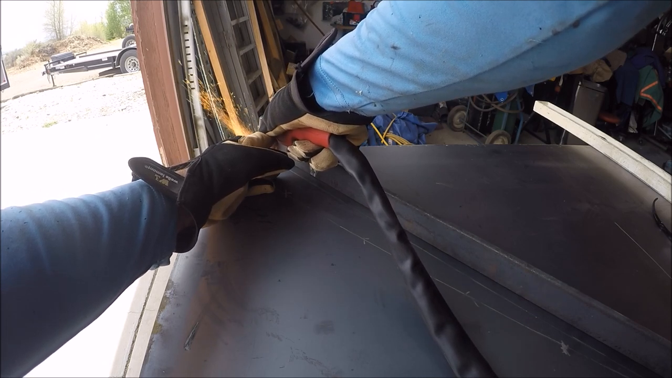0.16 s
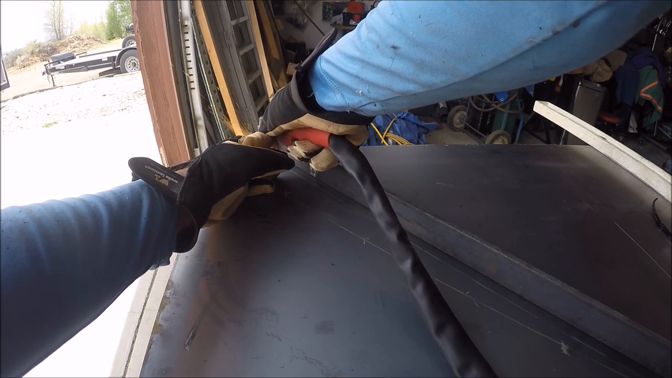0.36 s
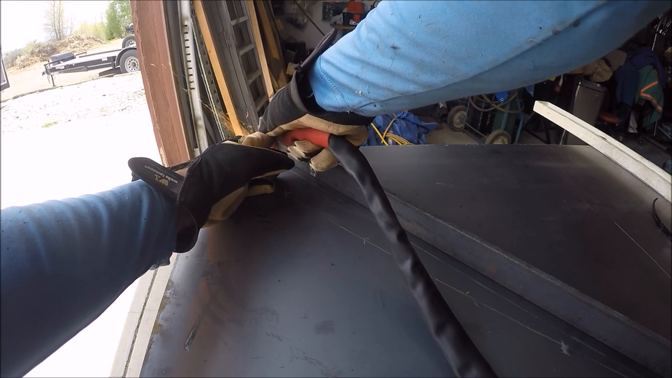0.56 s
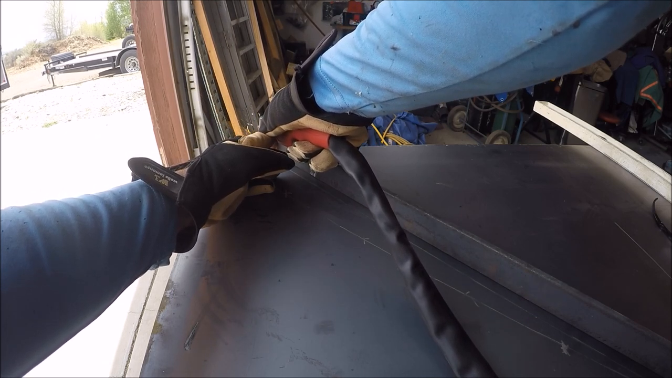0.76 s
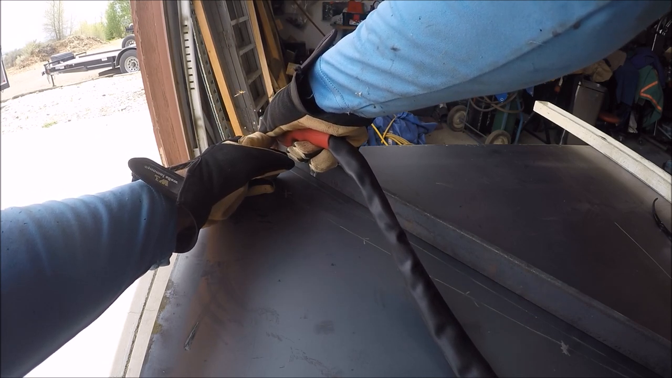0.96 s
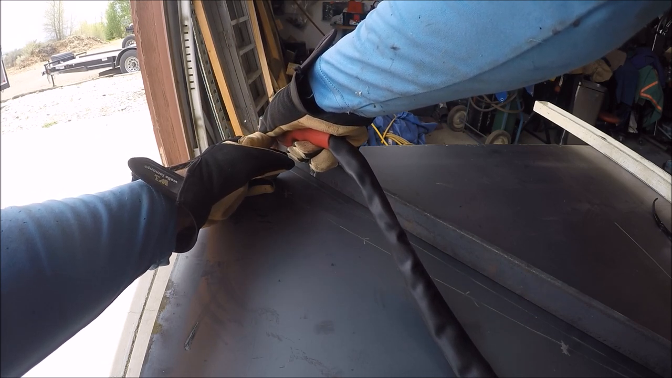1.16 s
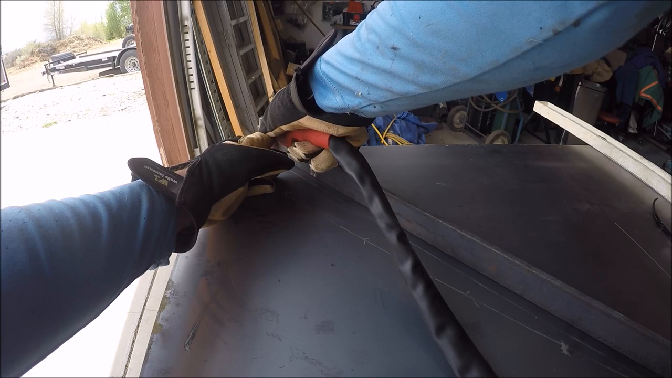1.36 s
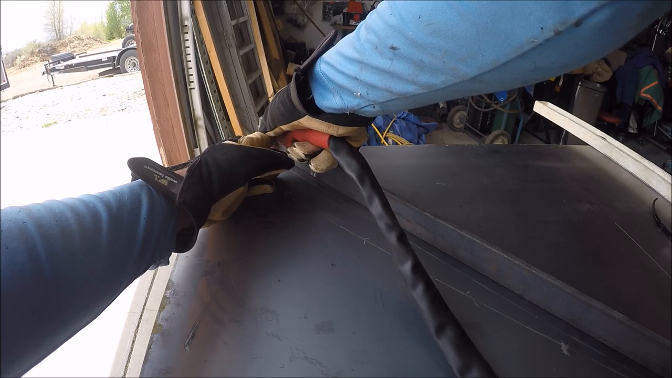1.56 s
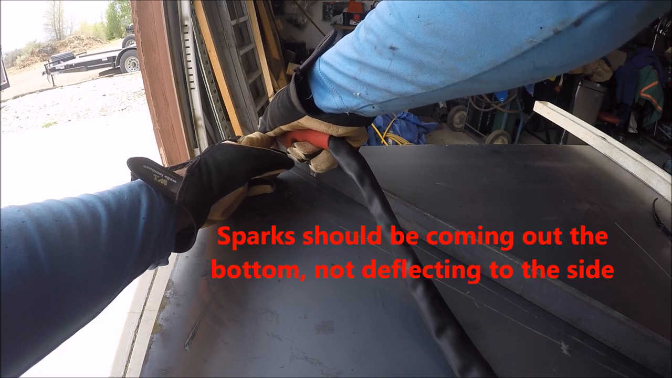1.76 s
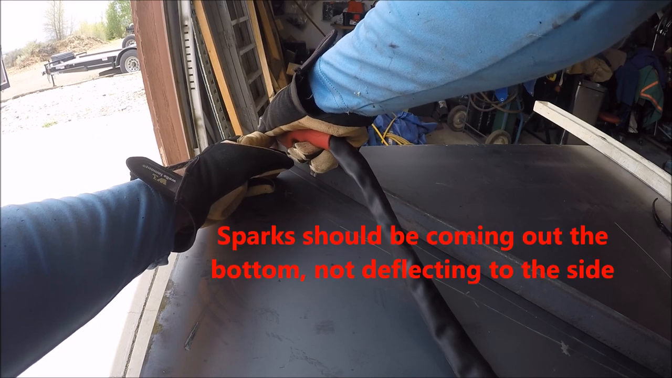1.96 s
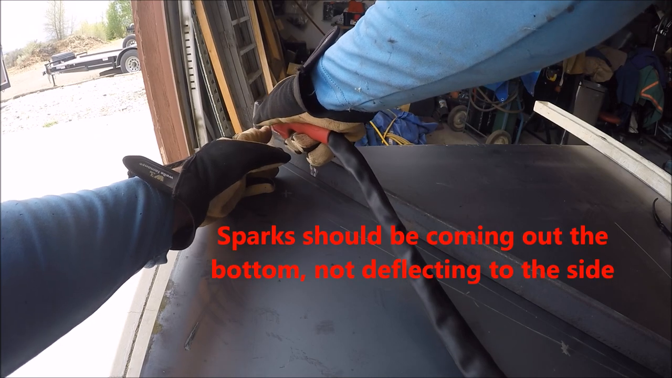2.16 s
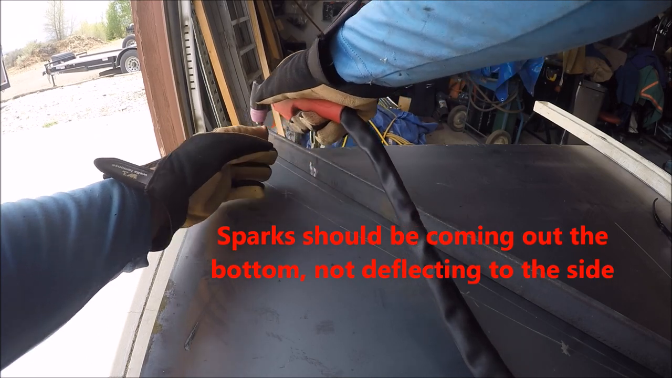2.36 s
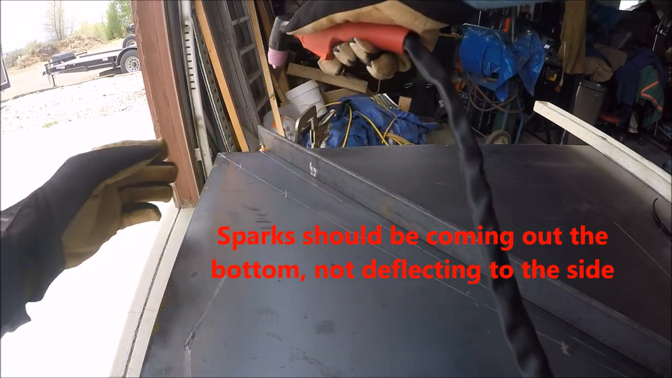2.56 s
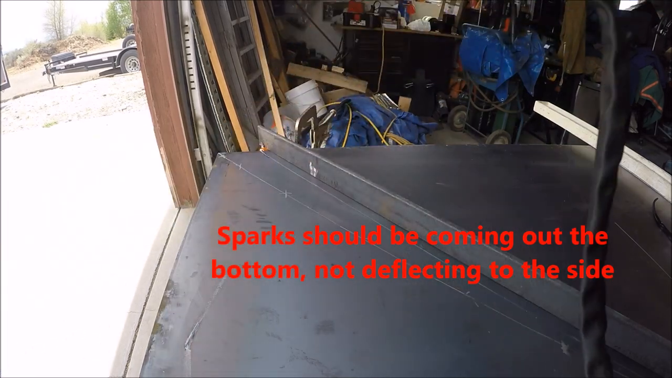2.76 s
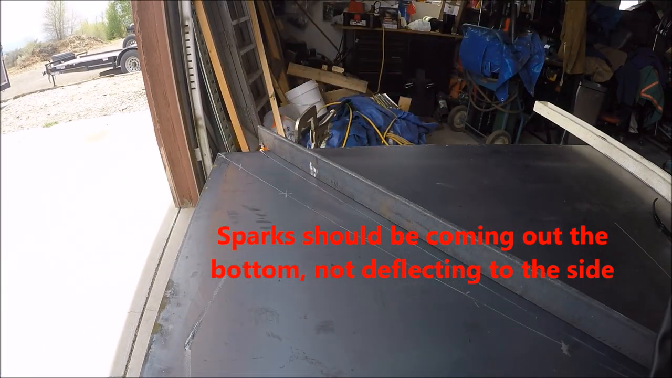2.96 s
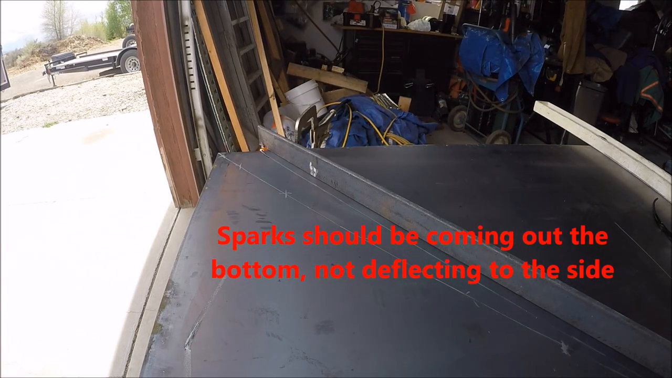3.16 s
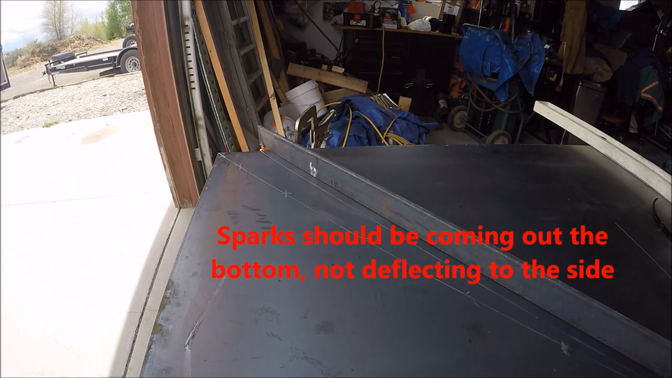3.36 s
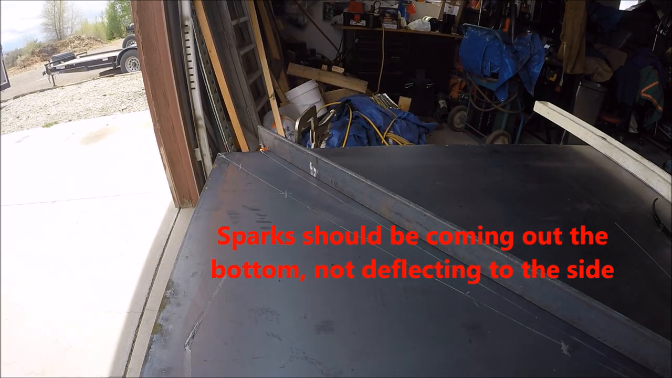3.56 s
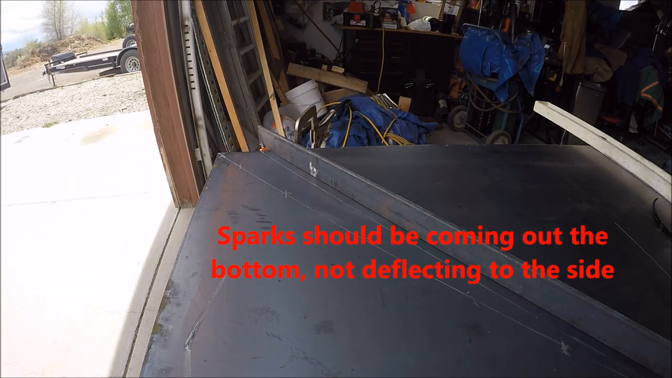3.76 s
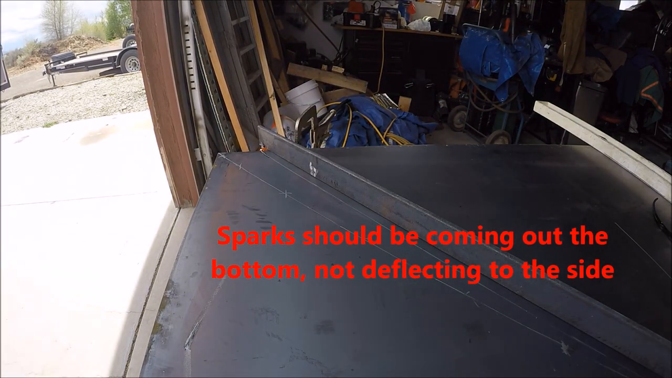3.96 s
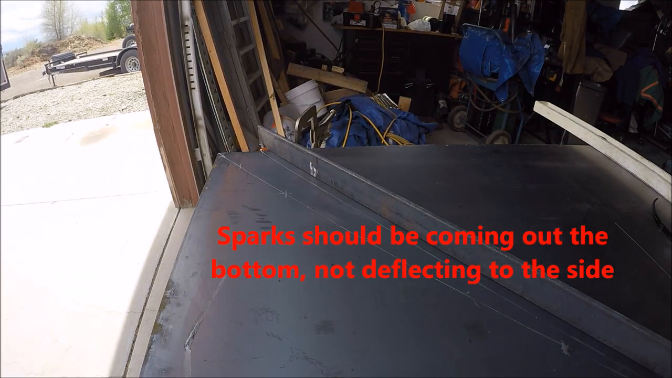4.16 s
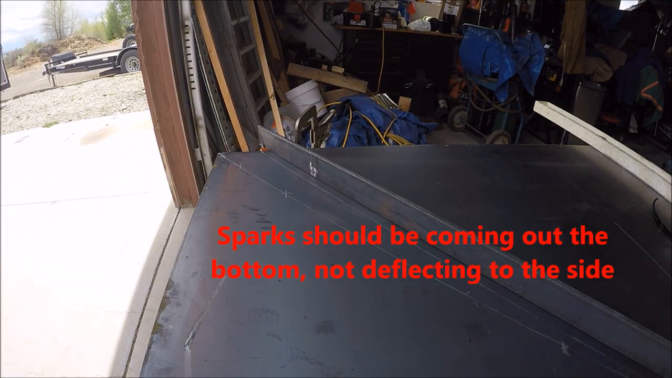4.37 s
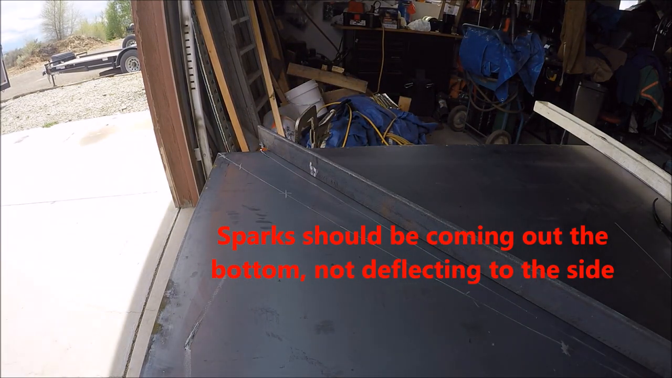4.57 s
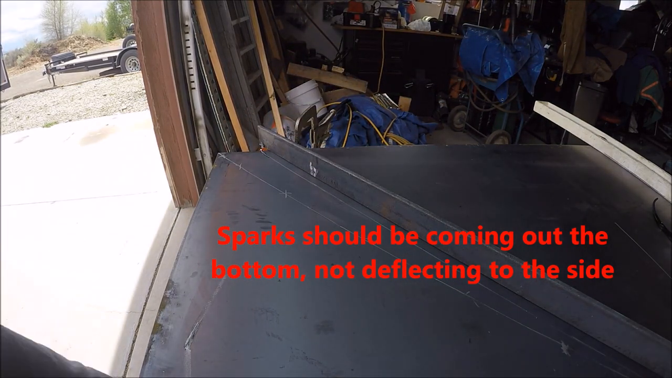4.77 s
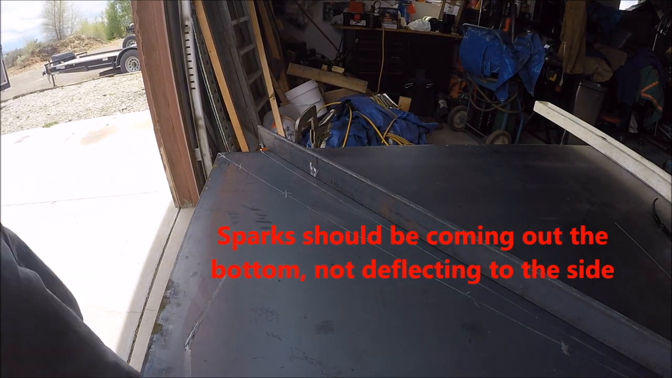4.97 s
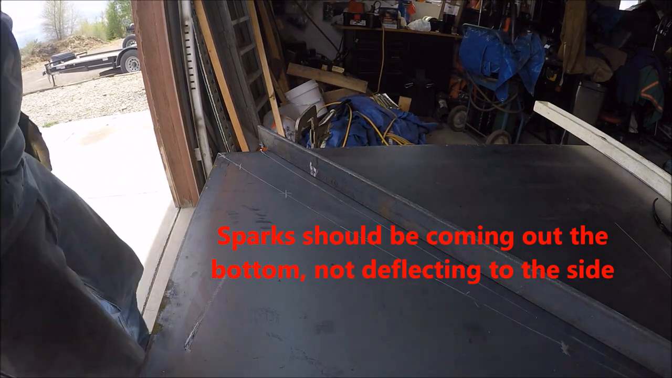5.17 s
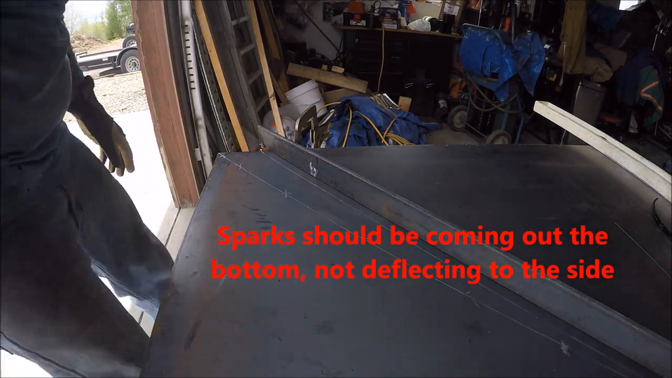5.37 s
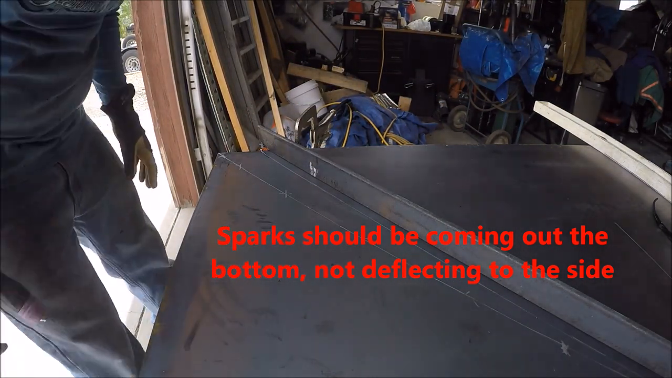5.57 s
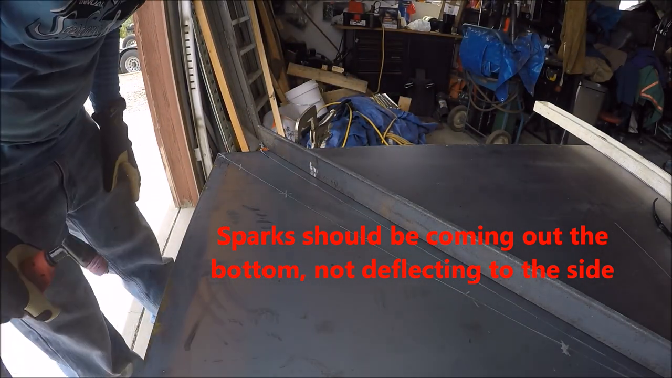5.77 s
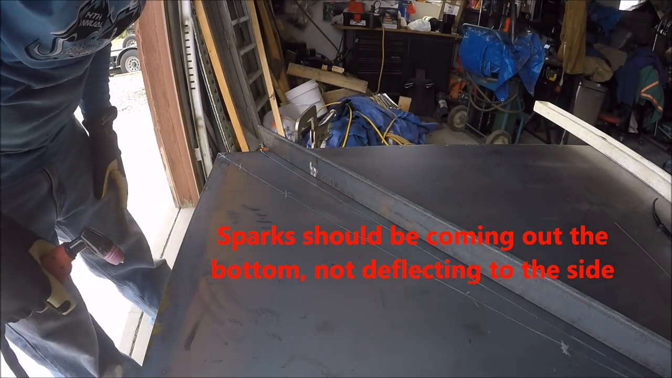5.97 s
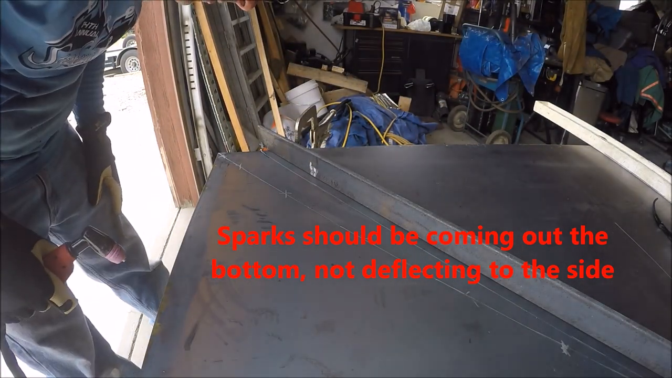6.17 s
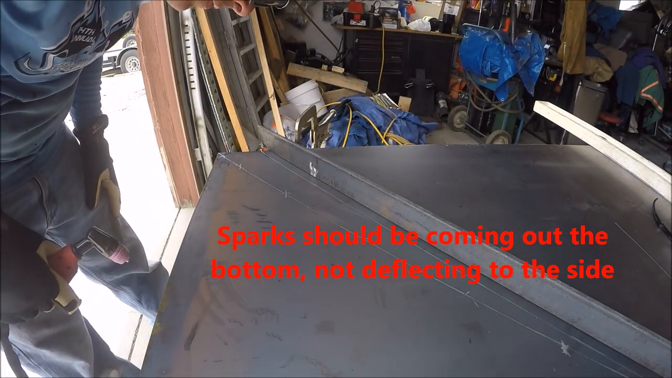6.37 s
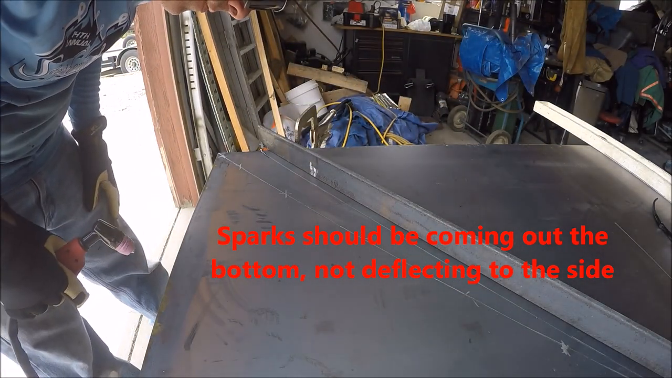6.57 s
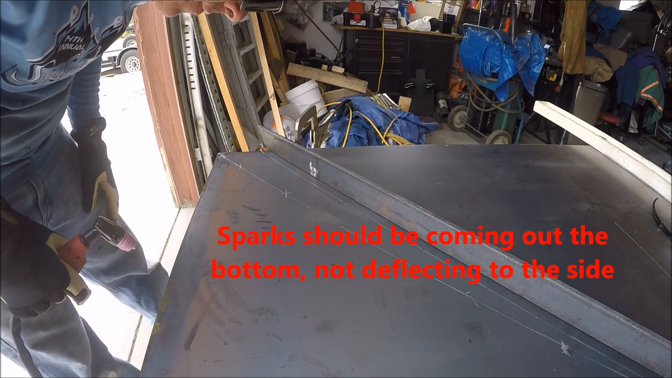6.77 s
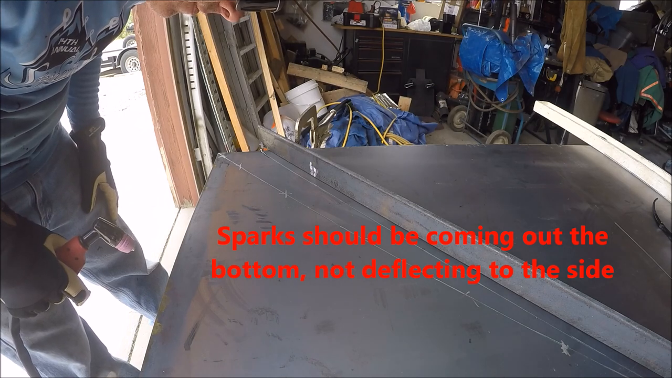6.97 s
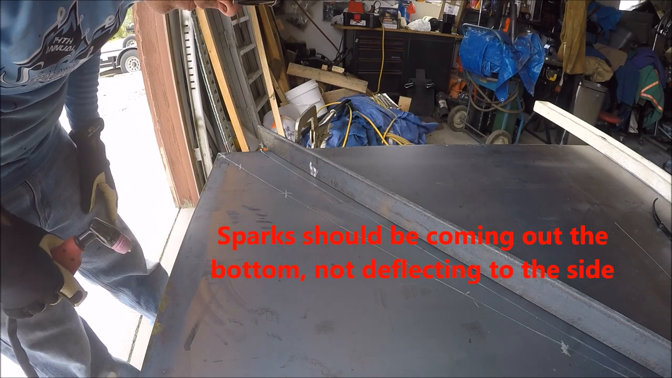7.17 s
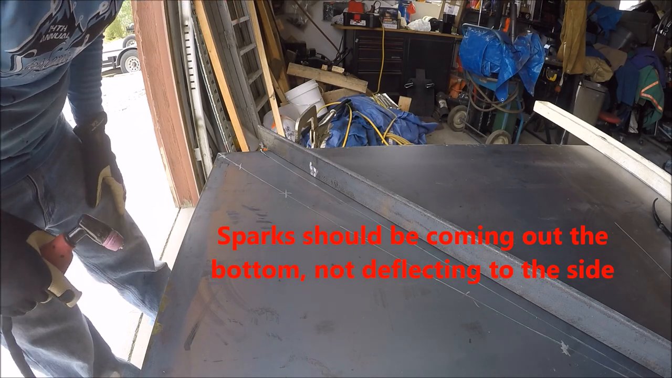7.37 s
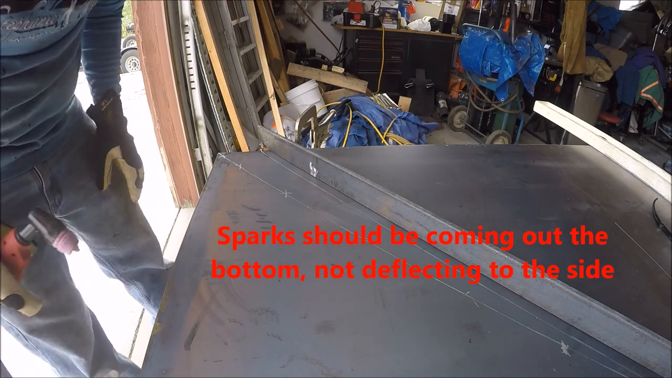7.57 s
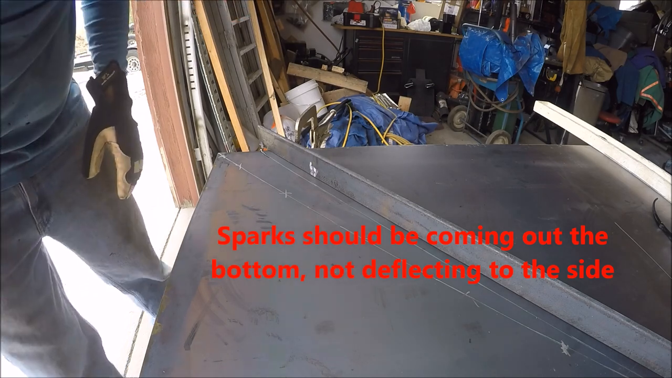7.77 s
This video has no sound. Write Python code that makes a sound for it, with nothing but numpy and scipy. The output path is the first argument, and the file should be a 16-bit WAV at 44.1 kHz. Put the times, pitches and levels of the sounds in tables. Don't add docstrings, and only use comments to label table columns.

```python
import sys
import numpy as np
from scipy import signal
from scipy.fft import rfft, irfft
from scipy.io import wavfile
from scipy.ndimage import uniform_filter1d

SR = 44100
rng = np.random.default_rng(int(sys.argv[2]) if len(sys.argv) > 2 else 0)


def bounce(signal):
    frames = np.transpose(np.atleast_2d(signal))
    limited = np.clip(frames, -1, 1)
    pcm = np.round(limited * 32767).astype(np.int16)
    wavfile.write(sys.argv[1], SR, pcm)


def ratio_of_db(decibels):
    return 10 ** (np.asarray(decibels, float) / 20)


N = 344414
HOP, SIZE = 256, 1024
HZ = np.fft.rfftfreq(SIZE, 1 / SR)[:, None]
T = np.arange(-(-N // HOP) + 1) * HOP / SR

# (time [s], level [dB])
REVERB_LEVEL = [(0, -36), (1.5, -36), (1.7, -43), (2.5, -35.5), (2.78, -37), (3.0, -34.5), (3.5, -39),
                (5.1, -39.5), (5.3, -37), (5.6, -39.5), (6.5, -42), (7.5, -40.5), (7.75, -38)]
# (frequency [Hz], level [dB])
REVERB_COLOUR = [(70, -40), (120, -13.5), (190, -15), (255, -1), (320, -11), (400, -7), (500, -8.5), (740, -1),
                 (900, -10), (1150, -12.5), (1700, -20.5), (3000, -33)]
CALM_DB = -54
# (time [s], peak level [dB], half
# length [s])
WIND_GUSTS = [(1.53, -42, .04), (2.05, -50, .1), (2.152, -45, 0.038), (2.348, -40, .05), (2.7, -48, .15),
              (3.04, -42.5, .12), (3.358, -40.5, 0.071), (3.68, -47, .12), (3.937, -48, 0.12),
              (4.11, -50, 0.058), (4.326, -38, 0.071), (4.48, -48, .05), (5.287, -40, 0.096),
              (5.51, -38, 0.039), (5.8, -51, 0.22), (6.702, -53, 0.32), (7.81, -44.5, .12)]
# (frequency [Hz], level [dB])
WIND_SPECTRUM = [(15, -11), (35, 12), (60, -9), (110, -7), (200, -9), (400, -34.5)]

# (time [s], peak level [dB], frequency [Hz], decay t60 [s])
BLOWS = [
    (1.5235, -5, 427, 0.0077),
    (1.5217, -23, 130, .03),
    (3.04, -23, 85, 0.1),
    (4.275, -32, 49.7, .2),
    (4.291, -29, 121, 0.16),
    (5.22, -29.5, 307, 0.087),
    (5.275, -25.5, 138, .1),
    (7.533, -19.5, 689, 0.015),
    (7.541, -23, 624, .06),
    (7.548, -22, 606, 0.081),
]

# (time [s], near delay [ms], near share [0-1], far delay [ms], far share [0-1])
REFLECTIONS = [(0, 0.47, 0.13, 1.6, 0.088), (.6, 0.45, 0.36, 1.03, 0.068), (2.15, 0.46, 0.41, 1.15, 0.091),
               (2.42, 0.47, .08, .25, 0.03), (2.6, 0.35, .1, 0.51, 0.3), (2.9, 0.29, 0.12, 0.83, 0.28),
               (3.12, 0.21, 0.083, 1.15, 0.3), (3.28, .22, .07, 1.21, .3), (3.85, 0.32, 0.09, 1.2, 0.17),
               (4.2, 0.28, 0.18, 1.0, 0.16), (4.45, 0.24, 0.1, .84, .2), (4.7, 0.45, 0.041, 0.71, 0.14),
               (5.5, 0.14, 0.098, 0.32, .05), (6.0, 0.21, 0.25, 0.36, 0.053)]
# (frequency [Hz], width [Hz], level [dB])
CASE_MODES = [(15500, 500, 1), (3380, 300, 2.5), (5800, 700, 3.5), (6575, 410, -2.5), (7280, 640, 4),
              (8250, 510, -3.5), (8790, 980, 1.5), (12750, 280, -3)]
EDGE_ECHO_S, EDGE_ECHO_HALF_S, EDGE_ECHO_SHARE = 2.75, 0.37, 0.27
EDGE_ECHO_MS, EDGE_ECHO_MS_PER_S = 1.0, 1.15

# (time [s], stretch of every frequency [ratio], depth [0-1])
CARRY_STRETCH = [
    (2.8, 0.96, 0.05),
    (3.0, 1.27, 0.25),
    (3.3, 1.13, 0.45),
    (3.55, 1.03, 0.8),
    (3.95, 1.0, 0.94),
    (4.2, 1.06, 1),
    (4.45, 1.28, 0.84),
    (4.7, 1.43, .6),
    (5.0, 1.55, 0.17),
]
CLOSEST_S = 3.9
# (frequency [Hz], width [Hz], level [dB],
# share of the stretch coming [0-1], share going [0-1])
CARRIED_SHADOWS = [(7600, 1500, 2.5, 0.4, 1.2), (9820, 1480, -13, 0.66, 0.93), (6220, 550, -14, 1, 0.21),
                   (5230, 700, 3, .05, .1), (4554, 670, -4.5, .05, 0.74), (2200, 250, 6, 0.47, 0.13),
                   (1750, 440, -18, 0.74, .3)]
TIPPING_S, TIPPING_HALF_S = 2.46, 0.25
TIPPING_SHADOWS = [(1030, 330, 6.5, -100), (1600, 540, 3, -1000), (3100, 500, -5, -2500)]
LEAVING_S, LEAVING_HALF_S = 2.9, 0.29
LEAVING_SHADOWS = [(4600, 460, 5, 1100), (5500, 630, -4.5, 602), (2750, 250, -5, -1500)]
PASSING_S, PASSING_HALF_S = 3.67, 0.75
PASSING_SHADOWS = [(11900, 1200, 3, -1800), (13400, 1200, -9, -1500), (15000, 900, -4, 100)]
TURN_S, TURN_HALF_S = 4.95, 0.44
TURNING_SHADOWS = [(4100, 2100, 4, 600), (5720, 600, -6, 900), (6860, 580, 8, 900), (8400, 1400, -7, 1000),
                   (10400, 800, 1.5, 2600), (11500, 900, -7.5, 4500), (13200, 1000, 2, 6000)]
SETTLING_S, SETTLING_HALF_S = 5.25, 0.2
SETTLING_SHADOWS = [(5950, 600, 4, 500), (9860, 1800, -3, 1000), (13800, 1200, 1, 1000)]
STAND_S, SETTLE_S = 5.4, 0.41
STANDING_SHADOWS = [(4480, 1050, -4), (8790, 440, 2.5), (13500, 3000, -5.5)]

# (time [s], level [dB], aim [dB]), aim rising as the nozzle turns away and the beam spreads
JET_LEVEL = [(2.3, -30, 7.5), (2.45, -28, 10.5), (2.6, -27, 9.5), (2.75, -28, 8), (2.9, -26.5, 7),
             (3.2, -26.5, 4), (3.5, -23, 0), (3.9, -21.5, -2), (4.1, -21, 0), (4.4, -21.5, 3),
             (4.7, -24.5, 4), (4.85, -24, 4), (5.0, -21, 4.5), (5.3, -23.5, 5), (5.5, -25.5, 1),
             (5.75, -29, 2), (7.6, -29, 2.5), (7.8, -31.5, 3)]
# (frequency [Hz], level [dB])
JET_SPECTRUM = [(300, -38), (1100, -20.5), (1900, -14), (2600, -13), (4000, -5), (6000, -0.5), (9000, -2.5),
                (11000, -8.5), (13000, -15), (15500, -23)]
FIZZ_DB, FIZZ_PER_AIM, CLEAR_S, HIDDEN_DB = 5, 0.47, 2.6, -5

# (time [s], level [dB])
ROAR_LEVEL = [
    (1.535, -32.5),
    (1.75, -28),
    (2.17, -26.5),
    (2.33, -24.5),
    (2.475, -19.5),
    (2.68, -31.5),
    (2.9, -42.5),
    (3.05, -36),
    (3.4, -33),
]
# (frequency [Hz], level [dB])
ROAR_SPECTRUM = [(40, -27), (150, -19.5), (400, -6.5), (1300, 0), (2000, -7), (3000, -2.5), (4300, -7),
                 (6000, -4.5), (8000, -12), (15000, -17)]
# (frequency [Hz], width [Hz], level [dB])
ROAR_RESONANCES = [(617, 180, 8), (1000, 344, -9), (2250, 220, -8), (4300, 580, 7), (5100, 300, -2.5),
                   (10100, 630, -3.5), (1200, 200, 2), (7400, 270, -1), (12200, 300, 3), (13700, 1200, -10)]
LIFT_S, LIFT_PER_S, LIFT_MOST = 2.028, 5.12, 5.3

ARC_STOP_S = 1.5238
# (time [s], level [dB])
ARC_LEVEL = [
    (0.0, -16.5),
    (0.15, -17),
    (0.6, -16.5),
    (1.515, -16.2),
]
# (frequency [Hz], level [dB])
ARC_SPECTRUM = [(40, -29), (150, -18), (400, -13.5), (1300, -3.5), (2400, -7.5), (3000, 0.5), (5000, -5),
                (7500, -6.5), (10000, -9.5), (15000, -16)]
# (frequency [Hz], width [Hz], level [dB])
ARC_RESONANCES = [(621, 270, 12), (956, 203, -14.5), (1660, 550, 2), (2290, 250, -1), (2700, 200, 3.5),
                  (11800, 440, 1), (3300, 120, 4), (3810, 130, 4.5), (4650, 410, 4.5), (5900, 690, 4),
                  (14600, 900, 0.5), (3440, 140, -5.5), (7330, 120, -5)]
ARC_TREBLE_DB = -5.5

# (time [s], step over mean line [dB])
SPARSE_FRAMES = [(.093, 13.5), (1.567, 11.5), (1.887, 13), (2.249, 11.5), (2.74, 14.5), (3.805, 11.5),
                 (4.148, 14), (4.255, 13), (4.403, 12), (4.659, 13), (5.022, 12), (5.043, 14),
                 (5.129, 11.5), (5.236, 13.5), (5.79, 14), (5.811, 12.5), (6.153, 11.5), (6.281, 13.5),
                 (6.325, 11.5), (6.409, 11.5), (6.473, 12.5), (6.494, 12.5), (6.515, 11.5), (6.558, 13),
                 (6.579, 13.5), (6.772, 15), (7.158, 12.5), (7.326, 14.5), (7.605, 14.5)]
LINES, FIRST_FRAME = 941, 340
# (time [s], low edge [Hz], high edge [Hz], side level [dB])
SIDE_BANDS = [(1.405, 4100, 5250, -31), (1.405, 9700, 11200, -39), (3.728, 7500, 9000, -32),
              (3.728, 12400, 14600, -43.5), (4.076, 8200, 9800, -31), (4.076, 11100, 13200, -38),
              (4.192, 6800, 10400, -27), (4.262, 7600, 9100, -29), (4.275, 11800, 13800, -40),
              (5.352, 5500, 7000, -32), (6.63, 4200, 5400, -40), (6.654, 5200, 7000, -37),
              (6.654, 9700, 11300, -42)]
EDGE_HZ = 15270


def evened(x):
    return x / np.sqrt(np.mean(x ** 2))


def along(rows):
    s, *columns = np.transpose(rows)
    return [np.interp(T, s, c) for c in columns]


def ramp(s, length):
    return np.clip((T - s) / length, 0, 1)


def shelf(from_hz, to_hz):
    return np.clip((HZ - from_hz) / (to_hz - from_hz), 0, 1)


def bells(modes):
    return sum(db / (1 + (2 * (HZ - centre) / width) ** 2) for centre, width, db in modes)


def sliding(mid_s, half_s, modes):
    weight = np.clip(1.5 - 1.5 * abs(T - mid_s) / half_s, 0, 1)
    return weight * bells([(centre + climb * (T - mid_s), width, db) for centre, width, db, climb in modes])


def colour(points, modes=()):
    f, db = np.transpose(points)
    return np.interp(np.log(HZ + 1), np.log(f), db) + bells(modes)


def turbulence(patchy_db, flicker_db):
    patches = rng.standard_normal((len(T), len(HZ)))
    patches = uniform_filter1d(patches, size=12, axis=0)
    patches = uniform_filter1d(patches, size=9, axis=1)
    flutter = uniform_filter1d(rng.standard_normal(len(T)), size=5)
    return patchy_db * evened(patches).T + flicker_db * evened(flutter)


def levelled(shape_db, level_db, lo_hz, hi_hz):
    gain = ratio_of_db(shape_db + 0 * T)
    band = ((HZ > lo_hz) & (HZ < hi_hz)) * gain ** 2
    return gain * ratio_of_db(level_db) / np.sqrt(band.mean(axis=0))


def hiss(gain):
    z = signal.stft(rng.standard_normal(N), nperseg=SIZE, noverlap=SIZE - HOP)[2]
    return signal.istft(z * gain, nperseg=SIZE, noverlap=SIZE - HOP)[1][:N]


def reverb_and_wind():
    gusts = sum(ratio_of_db(db) ** 2 * np.exp(-((T - s) / half) ** 2) for s, db, half in WIND_GUSTS)
    wind_db = 10 * np.log10(ratio_of_db(CALM_DB) ** 2 + gusts)
    reverb = levelled(colour(REVERB_COLOUR), along(REVERB_LEVEL)[0], 180, 870)
    reverb = reverb * ratio_of_db(turbulence(patchy_db=1.5, flicker_db=0.68))
    wind = levelled(colour(WIND_SPECTRUM), wind_db, 25, 110)
    wind = wind * ratio_of_db(turbulence(patchy_db=1.5, flicker_db=-0.5))
    return np.sqrt(reverb ** 2 + wind ** 2)


def knocks():
    out, t = np.zeros(N), np.arange(SR // 4) / SR
    for s, db, hz, t60 in BLOWS:
        swing = -ratio_of_db(db - 60 * t / t60) * np.sin(2 * np.pi * hz * t)
        swing *= 1 - np.exp(-t * hz * 6)
        part = out[round(s * SR):][:len(t)]
        part += swing[:len(part)]
    return out


def path():
    near_ms, near, far_ms, far = along(REFLECTIONS)
    comb = 1 + near * shelf(1000, 8700) * np.exp(2j * np.pi * HZ * near_ms / 1000)
    comb += far * shelf(1500, 7000) * np.exp(2j * np.pi * HZ * far_ms / 1000)
    swing = T - EDGE_ECHO_S
    edge = EDGE_ECHO_SHARE * np.clip(1.5 - 1.7 * abs(swing) / EDGE_ECHO_HALF_S, 0, 1)
    edge_ms = EDGE_ECHO_MS + EDGE_ECHO_MS_PER_S * swing
    comb += edge * shelf(1500, 5000) * np.exp(2j * np.pi * HZ * edge_ms / 1000)
    return 20 * np.log10(abs(comb) + 0.12) + bells(CASE_MODES)


def shadows():
    stretch, depth = along(CARRY_STRETCH)
    total = 0
    for centre, width, db, coming, going in CARRIED_SHADOWS:
        scale = stretch ** np.where(T < CLOSEST_S, coming, going)
        total = total + depth * bells([(centre * scale, width * scale, db)])
    total = total + sliding(LEAVING_S, LEAVING_HALF_S, LEAVING_SHADOWS)
    total += sliding(PASSING_S, PASSING_HALF_S, PASSING_SHADOWS)
    total += sliding(TURN_S, TURN_HALF_S, TURNING_SHADOWS)
    total += sliding(SETTLING_S, SETTLING_HALF_S, SETTLING_SHADOWS)
    return total + ramp(STAND_S, SETTLE_S) * bells(STANDING_SHADOWS)


def free_jet():
    level_db, aim_db = along(JET_LEVEL)
    fizz_db = FIZZ_DB + FIZZ_PER_AIM * np.minimum(aim_db, 4)
    fizz_db += HIDDEN_DB * (1 - ramp(CLEAR_S - 0.15, 0.17))
    fizz_db -= 5 * ramp(STAND_S - 0.1, 0.11)
    aim = aim_db * (1 - shelf(4400, 5860)) * shelf(1300, 2400) + fizz_db * shelf(8500, 12000)
    lifted_db = 22 * np.clip(T - 2.3, -2, 0)
    shape = colour(JET_SPECTRUM) + path() + aim + shadows()
    return levelled(shape, level_db + lifted_db, 4040, 9400) * ratio_of_db(turbulence(patchy_db=1.38, flicker_db=0.01))


def roar_on_plate():
    lift = np.clip(LIFT_PER_S * (T - LIFT_S), 0, LIFT_MOST)
    edge_hz = 15000 * np.exp(-lift)
    lows_db = 5.1 * lift * (1 - shelf(60, 440))
    shape = colour(ROAR_SPECTRUM, ROAR_RESONANCES) + path() + lows_db
    shape -= 10 * np.log10(1 + (HZ / edge_hz) ** 3.5)
    crowding = 1 + (np.log((HZ + 1) / (0.42 * edge_hz)) / 0.47) ** 2
    shape += 5.2 * np.clip(lift - 1.4, 0, 1) / crowding
    shape += sliding(TIPPING_S, TIPPING_HALF_S, TIPPING_SHADOWS)
    fade_db = -40 * np.clip(T - 3.0, 0, 2)
    level_db = along(ROAR_LEVEL)[0] + fade_db
    return levelled(shape, level_db, 40, 2000) * ratio_of_db(turbulence(patchy_db=1.78, flicker_db=0.1))


def arc():
    shape = colour(ARC_SPECTRUM, ARC_RESONANCES) + path() + ARC_TREBLE_DB * shelf(5500, 9150)
    shape = shape + 1.8 * rng.standard_normal(HZ.shape)
    gain = levelled(shape, along(ARC_LEVEL)[0], 1200, 6750)
    plasma = hiss(gain * ratio_of_db(turbulence(patchy_db=0.78, flicker_db=0.18)))
    after = np.arange(N) / SR - ARC_STOP_S
    snap = np.exp(-abs(after) / 0.00041)
    tail = ratio_of_db(-15 - 60 * abs(after) / 0.25)
    return plasma * np.where(after < 0, 1, snap + tail)


def scene():
    started = np.clip((np.arange(N) / SR - ARC_STOP_S) / 0.0023 + 1, 0, 1)
    air = hiss(np.hypot(roar_on_plate(), free_jet()))
    mono = arc() + started * air + hiss(reverb_and_wind()) + knocks()
    return np.array([mono, mono])


def sparse_frames(x):
    n, k = np.arange(2 * LINES)[:, None], np.arange(LINES)
    window = np.sin(np.pi * (n + 0.5) / (2 * LINES))
    basis = window * np.cos(np.pi / LINES * (n + 0.5 + LINES / 2) * (k + 0.5))
    basis *= np.sqrt(2 / LINES)
    out = x.copy()
    for s, step_db in SPARSE_FRAMES:
        centre = FIRST_FRAME + LINES * round((s * SR - FIRST_FRAME) / LINES)
        at = slice(centre - LINES, centre + LINES)
        lines = x[at] @ basis
        power = lines ** 2 + 1e-12
        step = ratio_of_db(step_db) * np.sqrt(power.mean() ** 0.5 * uniform_filter1d(power, size=24) ** 0.5)
        step *= ratio_of_db(-2.5 * np.exp(-k / 30) - 3.6 * np.clip(k / 500 - 0.6, 0, 1))
        error = step * np.round(lines / step) - lines
        out[at] += basis @ (error * (k < 640))
    return out


def side_noise():
    out, hz = np.zeros(N), np.fft.rfftfreq(2 * SIZE, 1 / SR)
    window = signal.windows.kaiser_bessel_derived(2 * SIZE, 4 * np.pi)
    for s, lo_hz, hi_hz, db in SIDE_BANDS:
        band = (hz > lo_hz) & (hz < hi_hz)
        burst = irfft(rfft(rng.standard_normal(2 * SIZE)) * band)
        centre = 446 + SIZE * round((s * SR - 446) / SIZE)
        out[centre - SIZE:centre + SIZE] += ratio_of_db(db) * evened(burst) * window
    return out


def top_cut(x):
    return signal.sosfilt(signal.butter(12, 16320, fs=SR, output="sos"), x)


def record(dry):
    lowpass = signal.firwin(801, EDGE_HZ, window=("kaiser", 10), fs=SR)
    mono = signal.oaconvolve(sparse_frames(dry[0]), lowpass, "same")
    side = side_noise()
    return top_cut(np.array([mono + side, mono - side]))


dry = scene()
out = record(dry)
bounce(out)
```